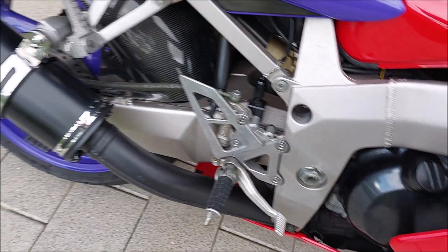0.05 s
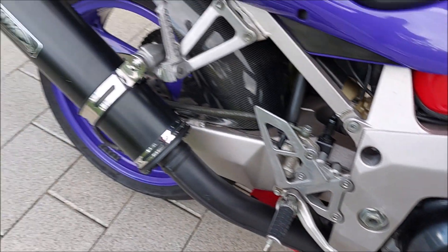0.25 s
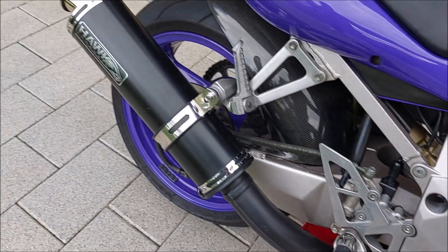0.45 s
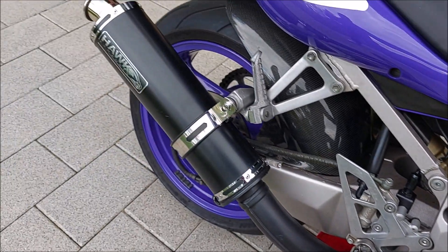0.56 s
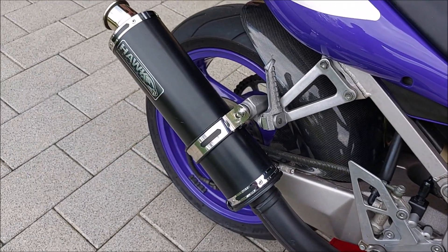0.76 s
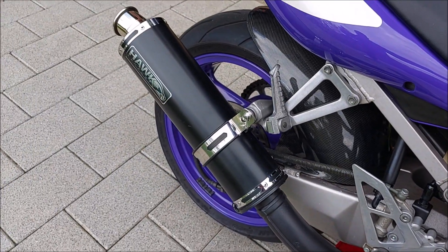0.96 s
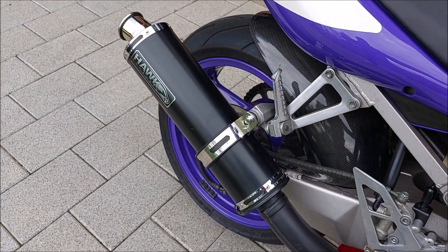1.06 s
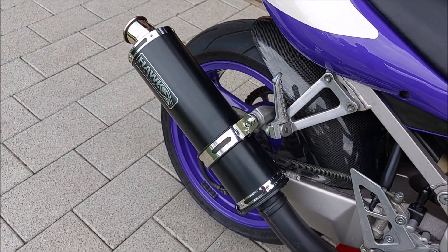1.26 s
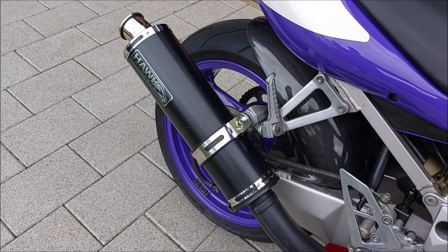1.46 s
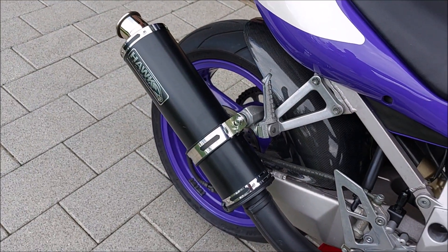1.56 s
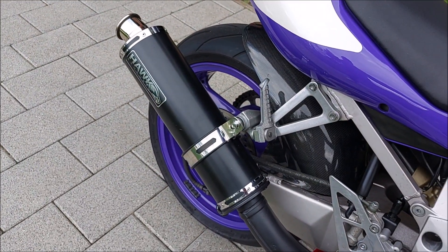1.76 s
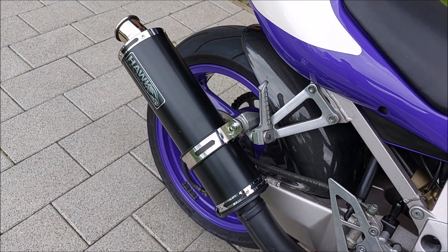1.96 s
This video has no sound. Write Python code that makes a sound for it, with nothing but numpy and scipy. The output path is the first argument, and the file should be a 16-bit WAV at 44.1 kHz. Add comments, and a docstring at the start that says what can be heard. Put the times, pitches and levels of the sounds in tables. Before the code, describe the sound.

A four-cylinder motorcycle idles roughly on a paved yard, its uneven exhaust puffs ringing in the silencer over low rumble and faint valve ticking; the close microphone moves to the tailpipe, and the throttle opens at the end.

```python
"""Sharp, uneven exhaust puffs come first: a four-cylinder motorcycle idles on a paved yard.
Each firing sends out a steep pressure puff, a duller wave back from the pipe and a rush of gas;
the puffs ring the silencer. Low rumble, the hiss and taps of the valve gear and brief rattles lie behind.
The microphone moves from the engine towards the tailpipe; the throttle opens at the very end."""
import sys
import numpy as np
from scipy import signal
from scipy.io import wavfile
from scipy.ndimage import uniform_filter1d

SR = 44100
rng = np.random.default_rng(int(sys.argv[2]) if len(sys.argv) > 2 else 0)


def transcribe(u):
    """Save the signal u as a 16-bit wav file named by the first command-line argument.

    u: samples, shape (n,) or (channels, n), limited to [-1, 1]; the rate is SR.
    q: integer samples, one column per channel.
    """
    v = np.clip(np.atleast_2d(u).T, -1, 1)
    q = np.round(v * 32767).astype(np.int16)
    wavfile.write(sys.argv[1], SR, q)


N = 88200
TIME = np.arange(N) / SR


def from_db(db):
    """Decibels to gain."""
    return 10 ** (np.asarray(db) / 20)


def rms_one(x):
    """Scale to unit rms."""
    return x / np.sqrt(np.mean(x ** 2) + 1e-20)


def at_time(rows, s=TIME):
    """Read a curve in time."""
    return np.interp(s, *np.transpose(rows))


def at_hz(rows, hz):
    """Read a spectrum on a log-frequency axis."""
    row_hz, values = np.transpose(rows)
    return np.interp(np.log(hz), np.log(row_hz), values)


def bell(s, width):
    """A smooth swell centred on s; width is its standard deviation in seconds."""
    return np.exp(-.5 * ((TIME - s) / width) ** 2)


def pressure_pulse(s, width, lean):
    """Pressure radiated by a slug of gas: a dip between two crests, the first larger if lean < 0."""
    u = (TIME - s) / width
    return (u * u - 1 + lean * u) * bell(s, width)


def resonate(x, hz, width_hz):
    """A two-pole resonance with unit gain on top: a narrower width rings longer."""
    r = np.exp(-np.pi * width_hz / SR)
    numerator = np.array([1, 0, -1]) * (1 - r * r) / 2
    denominator = [1, -2 * r * np.cos(2 * np.pi * hz / SR), r * r]
    return signal.lfilter(numerator, denominator, x + 1e-18)


# stereo likeness of the two channels: (frequency [Hz], correlation [-1 to 1])
LIKENESS = [(100, 1), (300, .5), (600, .5), (1100, -0.17), (3000, -0.09), (15000, -0.11)]
# stereo balance: (frequency [Hz], left minus right [dB])
TILT = [(100, -1), (1300, 1.5), (2400, -.5), (4400, -3.5), (6500, 2.5), (8000, -1), (10000, -6.5),
        (15000, -5)]


def noise(spectrum, low_hz, high_hz, count):
    """Stereo turbulence or clatter: count noise bands, each with its level, likeness and tilt; rms 1."""
    out = 0
    edges = np.geomspace(low_hz, min(high_hz, SR * .45), count + 1)
    white = rng.standard_normal((2, 2, N + SR // 4))   # the extra start lets the filters settle
    sides = np.array([[1], [-1]])   # left, right
    for k, band in enumerate(zip(edges, edges[1:])):
        band_filter = signal.butter(2, band, "band", fs=SR, output="sos")
        mid, side = signal.sosfilt(band_filter, white[k % 2])[:, -N:]
        hz = np.sqrt(band[0] * band[1])
        alike = np.clip(at_hz(LIKENESS, hz), -1, 1)
        stereo = np.sqrt(1 + alike) * mid + np.sqrt(1 - alike) * side * sides
        out = out + from_db(at_hz(spectrum, hz) + sides * at_hz(TILT, hz) / 2) * stereo
    return rms_one(out)


# firing rate of the engine: (time [s], rate [Hz])
SPEED = [(0, 43.16), (.19, 39.52), (.24, 43.8), (.32, 32.91), (.45, 39.4), (.56, 47.43), (.61, 42.21),
         (.76, 37.36), (.85, 44.31), (.95, 45.99), (1.05, 41.26), (1.21, 49.84), (1.27, 43.75),
         (1.45, 48.44), (1.57, 45.68), (1.72, 48.17), (1.9, 46.79), (2, 87.5)]
START_TURN = -.07   # firing intervals


def firing_phase():
    """Running count of firing intervals: the integral of the firing rate."""
    return START_TURN + np.cumsum(at_time(SPEED)) / SR


def crank_times(count):
    """Moments that come count times per firing."""
    phase = firing_phase()
    return np.interp(np.arange(1, int(phase[-1] * count) + 1) / count, phase, TIME)


# firings that burn unusually hard or soft: (time [s], level change [dB])
ODD_FIRINGS = [(0.0247, 4.0), (0.046, 11), (0.071, -6.5), (0.0975, -12), (0.1207, -5.5), (0.1458, 6.5),
               (0.1713, -10), (0.1967, -10), (0.2206, 5.5), (0.2677, 3.5), (0.2929, -14), (0.35, 11.5),
               (0.3791, -6.5), (0.4074, -3.5), (0.4337, -6), (0.4574, -4), (0.4822, -9), (0.5945, -4),
               (0.6918, -4.5), (0.7174, -3.0), (0.7706, -4), (0.795, -2.5), (0.9106, 3), (0.9972, -13),
               (1.2005, -6), (1.2213, 3), (1.2642, -7), (1.3533, 3.6), (1.4168, 2.5), (1.4595, -6),
               (1.4798, 4.5), (1.609, 4), (1.7161, -4), (1.7349, 3.5), (1.7553, -1.5), (1.8622, 3.5)]
# cylinders in firing order: (puff [dB], lateness [s], relative width, returning wave [dB], its delay [s])
CYLINDERS = [(-1.9, .0002, 0.91, -3, 0.0079), (-6.5, -.0004, 1.07, -2, .008),
             (-13.7, .0036, 1.25, -0.4, 0.0072), (-6.5, .0002, 1.15, -2, .0082)]
# throttle: (time [s], opening [0-1])
THROTTLE = [(0, 0), (1.9, 0.02), (1.94, 1), (2, 1)]
# strength of the exhaust at the microphone: (time [s], level [dB])
EXHAUST_LEVEL = [(0, -22.5), (.3, -25), (.42, -23), (.55, -23.5), (.7, -21.5), (.88, -19.5), (1.05, -19.5),
                 (1.25, -17.5), (1.45, -17), (1.75, -17.5), (1.88, -15.5), (2, -16)]
SCATTER_DB = .5


def firings():
    """Every firing: chance, odd burns and uneven cylinders, which even out as the throttle opens."""
    times = crank_times(count=1)
    odd_db = SCATTER_DB * rng.standard_normal(len(times))
    for s, change_db in ODD_FIRINGS:
        nearest = np.argmin(abs(times - s))
        times[nearest], odd_db[nearest] = s, change_db
    fired = []
    for k, (s, odd) in enumerate(zip(times, odd_db)):
        puff_db, late_s, width, return_db, delay_s = CYLINDERS[(k + 1) % len(CYLINDERS)]
        idle = 1 - at_time(THROTTLE, s)   # 1 with the throttle closed
        fired.append(dict(
            time=s, puff_time=s + late_s * idle, idle=idle, odd_db=odd,
            level_db=at_time(EXHAUST_LEVEL, s), strength_db=(puff_db + odd) * idle,
            width=width ** idle, return_db=return_db * idle, return_time=s + delay_s))
    return fired


PUFF_S, WEAK_WIDENING = .001, .02   # base width [s]; widening [share per dB of weakness]
# steep core of the hard firings; follows is dB per dB of puff strength
CRACK_DB, CRACK_S, CRACK_FOLLOWS = -18.5, 0.00047, 1.8
OPEN_CRACK_DB = 8   # stronger under throttle


def exhaust_puffs(fired):
    """Each firing expels a slug of gas with a steep core; weak burns make wider pulses."""
    puffs = 0
    for f in fired:
        at, level_db, strength_db = f["puff_time"], f["level_db"], f["strength_db"]
        width_s = PUFF_S * f["width"] * (1 - WEAK_WIDENING * f["odd_db"])
        puffs = puffs + from_db(level_db + strength_db) * pressure_pulse(at, width_s, lean=0)
        crack_db = CRACK_DB + level_db + CRACK_FOLLOWS * strength_db + OPEN_CRACK_DB * (1 - f["idle"])
        puffs = puffs + from_db(crack_db) * pressure_pulse(at, CRACK_S, lean=0)
    return puffs


# strength of the wave back from the pipe: (time [s], level [dB])
RETURN_LEVEL = [(0, -25), (.3, -28.5), (.42, -22), (.55, -26), (.7, -28), (.88, -22.5), (1.05, -20.5),
                (1.25, -18.5), (1.45, -14), (1.75, -17), (1.88, -14.5), (2, -20.5)]
RETURN_S, RETURN_FOLLOWS = 0.003, 0.35   # width [s]; level change [dB per dB of odd burn]
RETURN_LEAN = -0.68   # the first crest outweighs the second


def returning_waves(fired):
    """Each firing's wave comes back from the pipe later, as a wider and so duller pulse."""
    returns = 0
    for f in fired:
        db = at_time(RETURN_LEVEL, f["time"]) + f["return_db"] + RETURN_FOLLOWS * f["odd_db"]
        returns = returns + from_db(db) * pressure_pulse(f["return_time"], RETURN_S, RETURN_LEAN)
    return returns


# steady throb: (time [s], level [dB])
THROB_LEVEL = [(0, -42), (.3, -40), (.55, -39), (1.05, -38.5), (1.45, -33.5), (1.75, -34), (2, -28)]


def throb():
    """A steady sine at the firing rate, in step with the crank."""
    return -from_db(at_time(THROB_LEVEL)) * np.cos(2 * np.pi * firing_phase())


# silencer resonances: (frequency [Hz], width [Hz], left [dB], right [dB])
SILENCER = [(228.2, 20.6, 6, 16.5), (92, 61.6, 7.5, 11.5), (434, 68, 2.3, 4.5), (293, 142, 4, -31),
            (596, 10, 1, 5.5)]


def silencer_ring(puffs):
    """The puffs excite the silencer's resonances, each with its own left and right strength."""
    return sum(from_db([[left_db], [right_db]]) * resonate(puffs, hz, width_hz)
               for hz, width_hz, left_db, right_db in SILENCER)


# colour of the gas rush: (frequency [Hz], relative density [dB per Hz])
GAS = [(250, -1), (450, 0.5), (650, 5), (850, -8), (1100, -1.5), (2300, -5.5), (4000, -13), (7000, -19),
       (9000, -33.5), (12000, -21), (15500, -22)]
GAS_DB, GAS_DELAY_S, GAS_S = -23, 0.0032, 0.0042


def gas_rush(fired):
    """Turbulent gas follows each puff as a short swell of noise."""
    rush = 0
    for f in fired:
        db = GAS_DB + f["level_db"] + f["strength_db"] / 2
        rush = rush + from_db(db) * bell(f["puff_time"] + GAS_DELAY_S, GAS_S)
    return rush * noise(GAS, 231.6, 16900, count=16)


RIGHT_LAG_S, RIGHT_DB = 0.0002, -0.25   # the right channel comes later and softer, gas rush apart


def exhaust():
    """Puffs, returning waves, throb and silencer ring add up as pressure, with the gas rush over them."""
    fired = firings()
    puffs = exhaust_puffs(fired)
    left, right = puffs + returning_waves(fired) + throb() + silencer_ring(puffs)
    right = from_db(RIGHT_DB) * np.interp(TIME - RIGHT_LAG_S, TIME, right)
    return np.array([left, right]) + gas_rush(fired)


# colour of the engine block: (frequency [Hz], relative density [dB per Hz])
RUMBLE = [(25, -38), (45, 0), (70, 0.5), (125, 2.5), (170, -8), (250, -2), (450, -11), (700, -22),
          (1200, -64)]
# rumble: (time [s], level [dB])
RUMBLE_LEVEL = [(0, -32.5), (.12, -32), (.2, -36), (.4, -34.5), (.65, -39), (1.2, -33.5), (2, -32)]
# low thumps: (time [s], frequency [Hz], level [dB], length [s])
THUMPS = [(0.0836, 88, -22, 0.0057), (0.1247, 78, -21.5, 0.0129), (0.3244, 109, -19, 0.0073),
          (0.558, 94, -28, 0.0081), (1.12, 88, -24, 0.0087)]
DRONE_HZ, DRONE_S, DRONE_LENGTH_S, DRONE_DB = 228.65, 0.082, .031, -25   # a 229 Hz tone swells briefly


def rumble():
    """Low noise from the engine block, one brief sine swell near 229 Hz and a few soft sine thumps."""
    block = from_db(at_time(RUMBLE_LEVEL)) * noise(RUMBLE, 35.2, 927, count=10)
    drone = from_db(DRONE_DB) * bell(DRONE_S, DRONE_LENGTH_S) * np.sin(2 * np.pi * DRONE_HZ * TIME)
    thumps = sum(-from_db(db) * bell(s, length_s) * np.cos(2 * np.pi * hz * (TIME - s))
                 for s, hz, db, length_s in THUMPS)
    return block + drone + thumps


# valve gear and chain, hiss and taps together: (time [s], level [dB])
CLATTER_LEVEL = [(0, -46), (.3, -48), (.62, -50), (.9, -48.5), (1.15, -46.5), (1.4, -44), (1.8, -44.5),
                 (1.9, -42.5), (2, -42)]
# colour of their hiss: (frequency [Hz], relative density [dB per Hz])
CLATTER = [(600, -8.5), (720, -3), (880, -9.5), (1040, 1.5), (1180, -4.5), (1450, 0), (1710, -8.5),
           (2560, -6), (3270, -11.5), (3700, -11.5), (7300, -18), (8300, -22.5), (9400, -27.5),
           (11500, -20.5), (15500, -23.5)]
# engine casing rung by valve taps: (frequency [Hz], relative level [dB], width [Hz])
CASING = [(1041, 4.5, 35), (1343, -1.5, 17), (1980, -1.5, 90), (2283, -7.5, 13), (2620, -10, 160),
          (3400, -11, 17), (4370, -23.5, 70), (5050, -12, 80), (6170, -16, 81)]
CLATTER_DB, CLATTER_FLICKER_DB = -0.5, 1.1
CLATTER_SURGE_DB = 0.48   # swells once per engine cycle
TAPS_DB, TAP_SCATTER_DB = -8, 3.5


def valve_gear():
    """A flickering mechanical hiss, and taps four times per firing that ring the casing."""
    flicker = rms_one(uniform_filter1d(rng.standard_normal(N), size=220))
    surge = np.cos(2 * np.pi * np.cumsum(at_time(SPEED)) / SR / len(CYLINDERS))
    hiss_db = CLATTER_DB + CLATTER_FLICKER_DB * flicker + CLATTER_SURGE_DB * surge
    hiss = from_db(hiss_db) * noise(CLATTER, 596, 16580, count=26)
    at = (crank_times(count=4) * SR).astype(int)
    rings = 0
    for hz, db, width_hz in CASING:
        strength = from_db(TAP_SCATTER_DB * rng.standard_normal((2, len(at))))
        taps = np.zeros((2, N))
        taps[:, at] = strength * rng.choice([-1, 1], (2, len(at)))
        rings = rings + from_db(db) * rms_one(resonate(taps, hz, width_hz))
    return from_db(at_time(CLATTER_LEVEL)) * (hiss + from_db(TAPS_DB) * rms_one(rings))


# brief metallic rattles: (time [s], frequency [Hz], width [Hz], length [s], level [dB])
RATTLES = [(.12, 3560, 250, 0.013, -55), (.135, 1874, 120, .008, -49.5), (0.406, 1416, 150, 0.027, -52),
           (0.656, 1025, 90, .011, -48), (.755, 2240, 1590, 0.0095, -50.5), (1.123, 2900, 900, .004, -44),
           (1.126, 2570, 300, .007, -43.5)]


def rattles():
    """Loose metal parts buzz for a moment: noise through a doubled resonance, each at its own pitch."""
    out = 0
    for s, hz, width_hz, length_s, db in RATTLES:
        ring = resonate(resonate(rng.standard_normal((2, N)), hz, width_hz), hz, width_hz)
        out = out + from_db(db) * bell(s, length_s) * rms_one(ring)
    return out


def scene():
    """The whole motorcycle."""
    return exhaust() + rumble() + valve_gear() + rattles()


CUTOFF_HZ = 15800


def record(dry):
    """The top is cut steeply, without shifting the phase."""
    low_pass = signal.ellip(10, .05, 70, CUTOFF_HZ, fs=SR, output="sos")
    return signal.sosfiltfilt(low_pass, dry)


dry = scene()
out = record(dry)
transcribe(out)
```